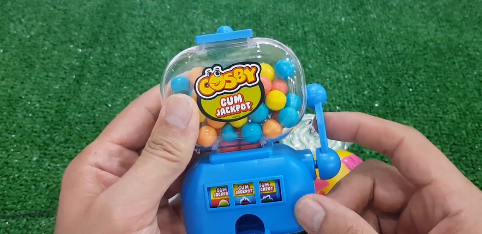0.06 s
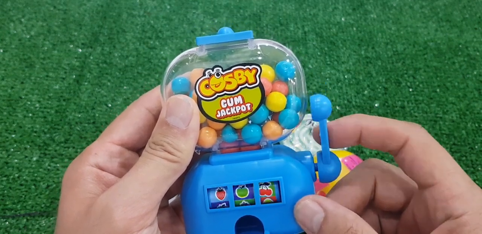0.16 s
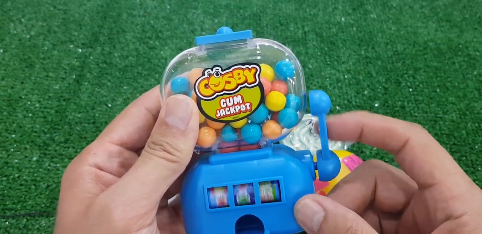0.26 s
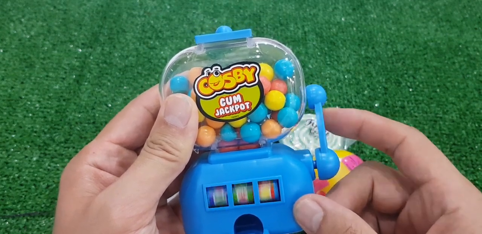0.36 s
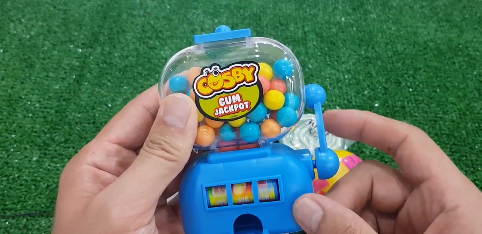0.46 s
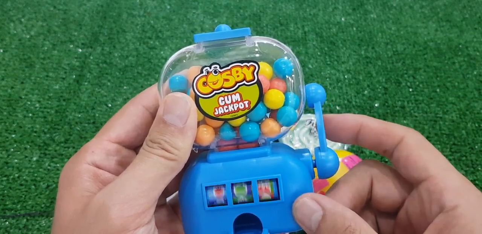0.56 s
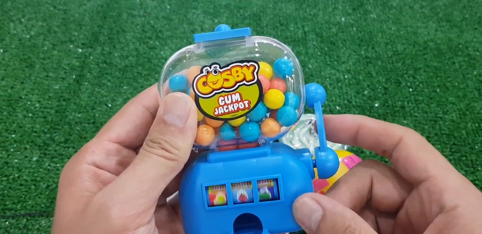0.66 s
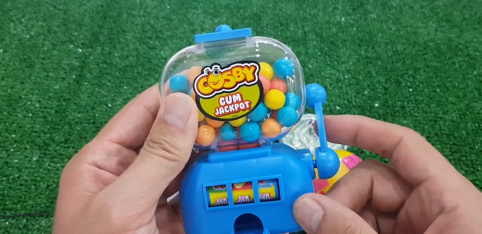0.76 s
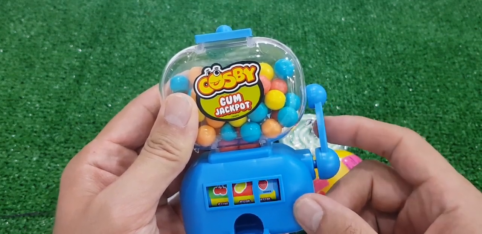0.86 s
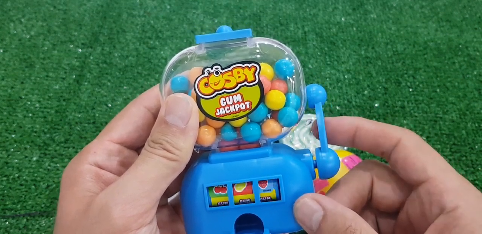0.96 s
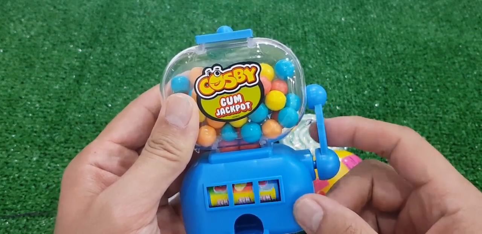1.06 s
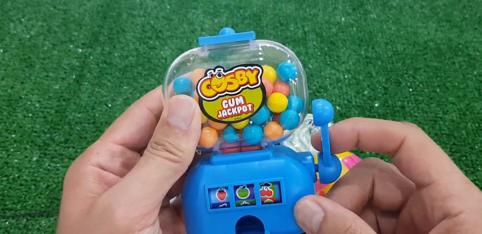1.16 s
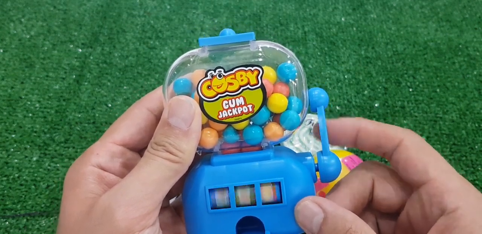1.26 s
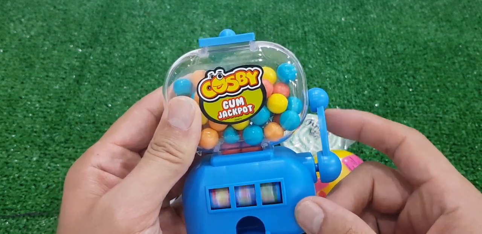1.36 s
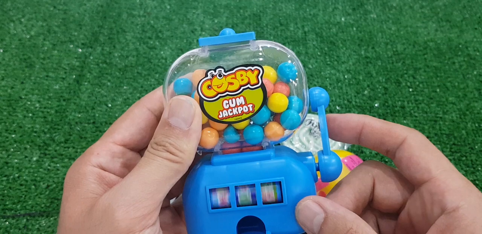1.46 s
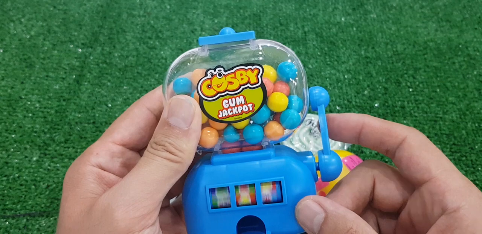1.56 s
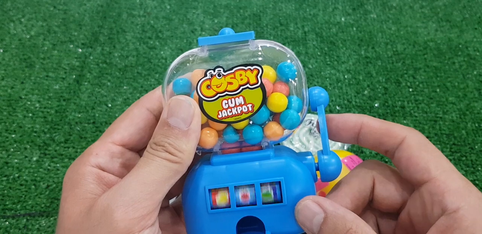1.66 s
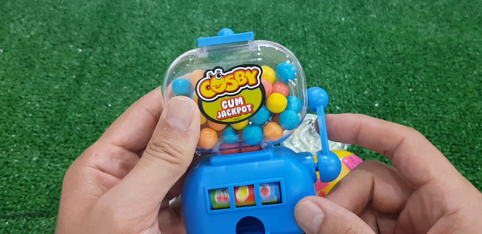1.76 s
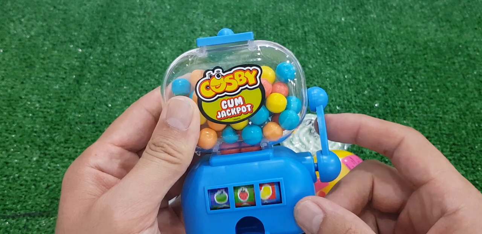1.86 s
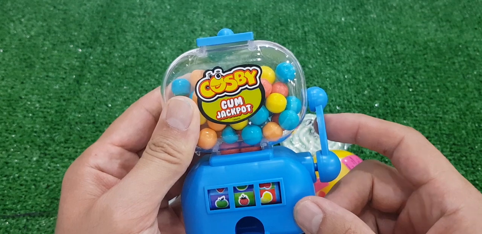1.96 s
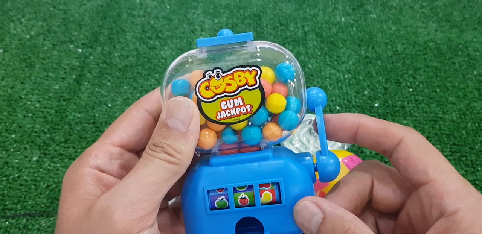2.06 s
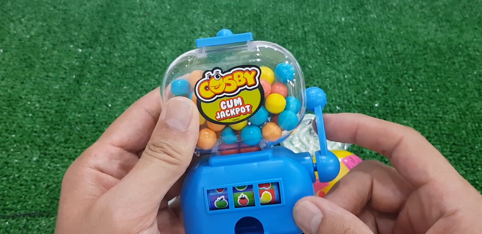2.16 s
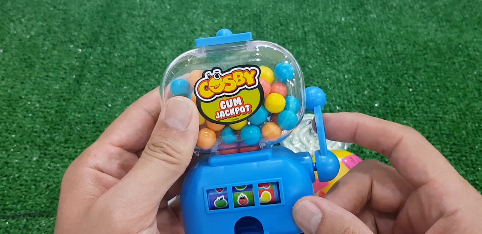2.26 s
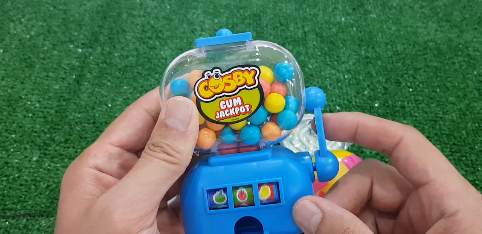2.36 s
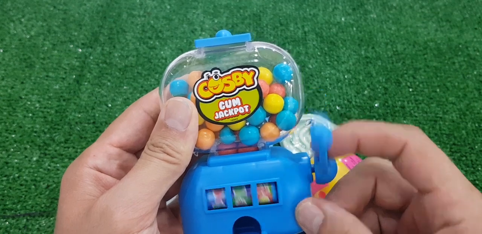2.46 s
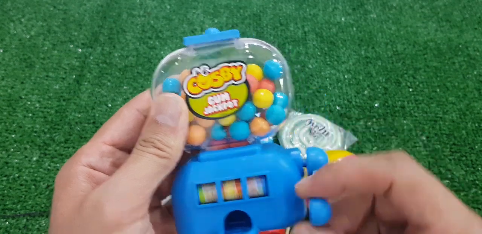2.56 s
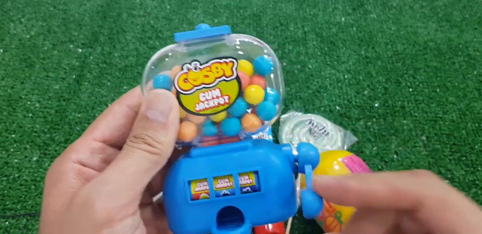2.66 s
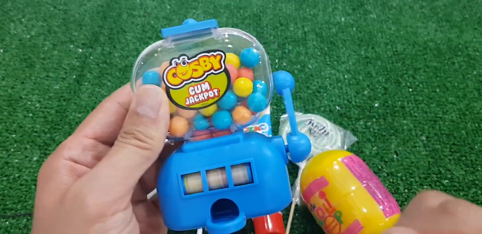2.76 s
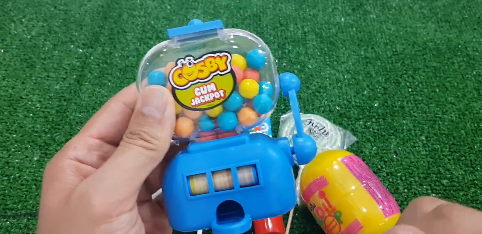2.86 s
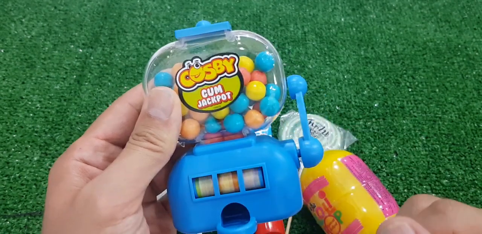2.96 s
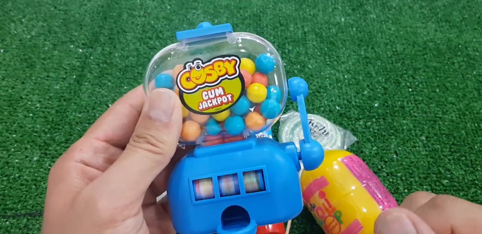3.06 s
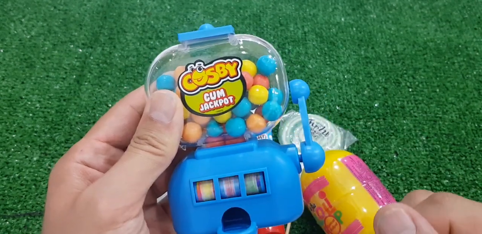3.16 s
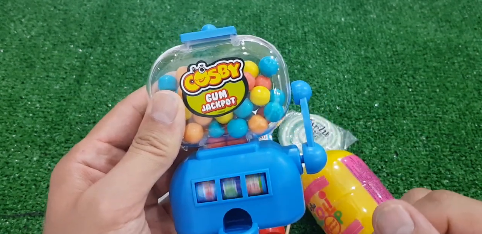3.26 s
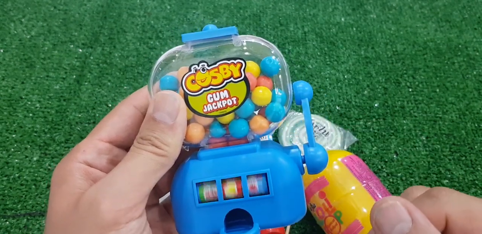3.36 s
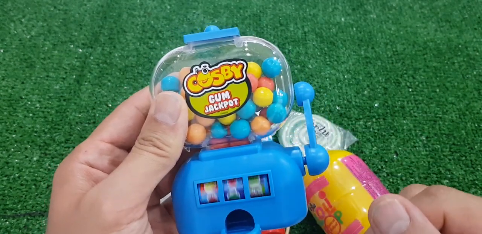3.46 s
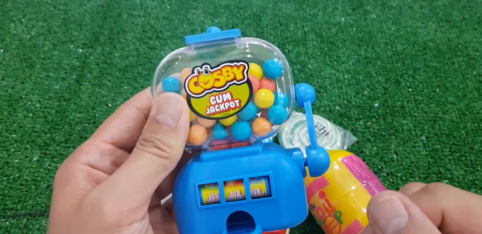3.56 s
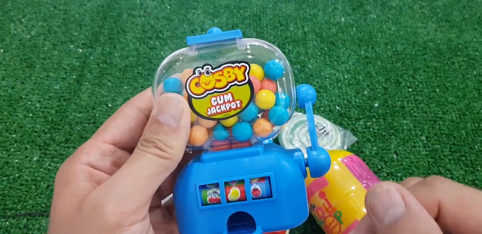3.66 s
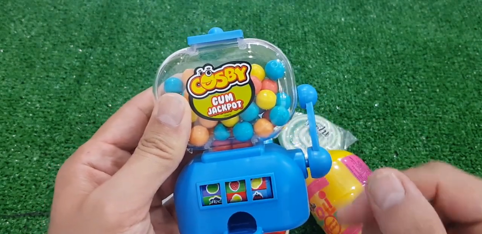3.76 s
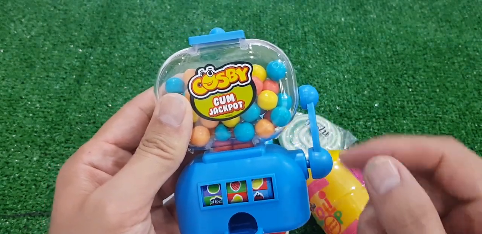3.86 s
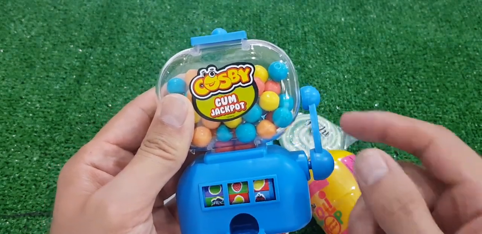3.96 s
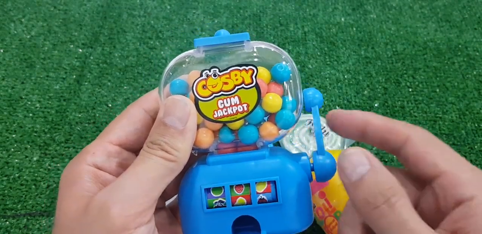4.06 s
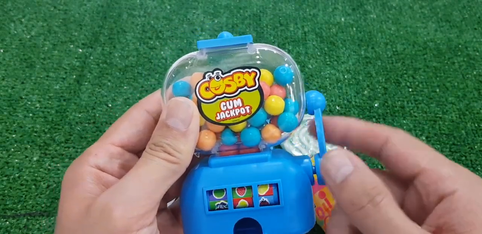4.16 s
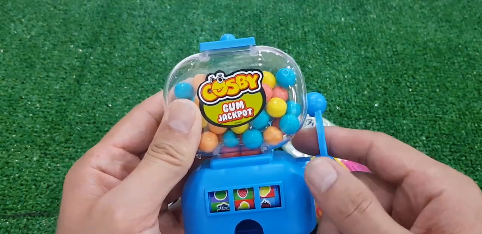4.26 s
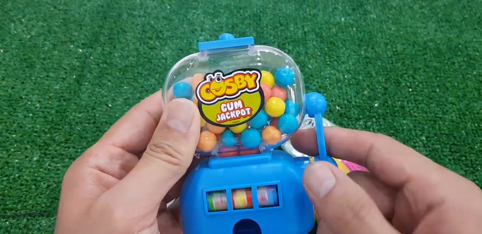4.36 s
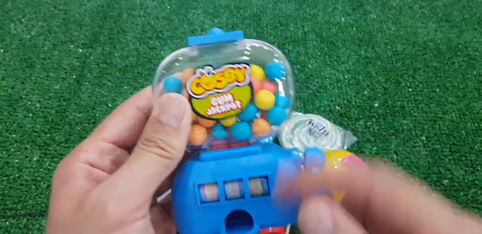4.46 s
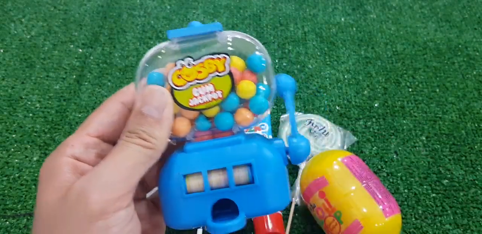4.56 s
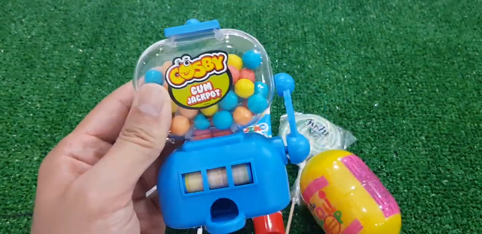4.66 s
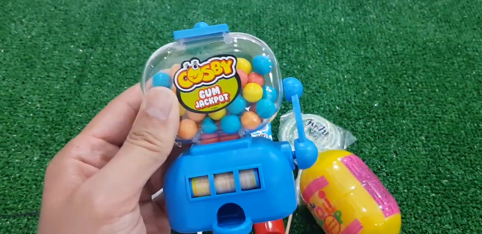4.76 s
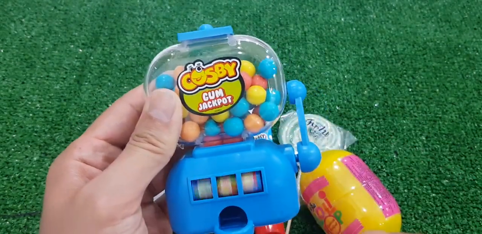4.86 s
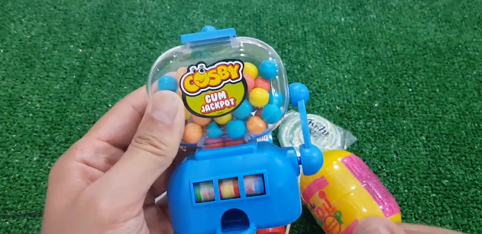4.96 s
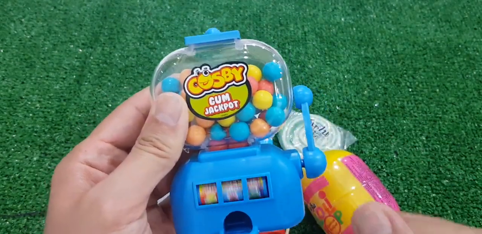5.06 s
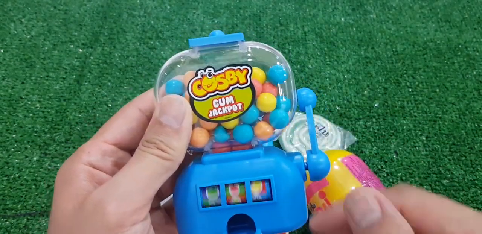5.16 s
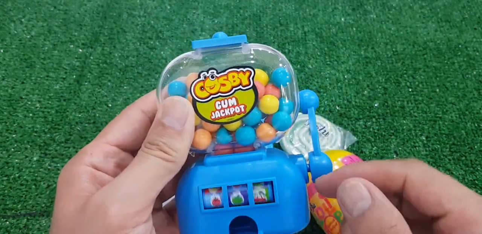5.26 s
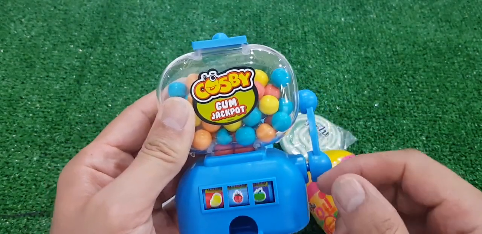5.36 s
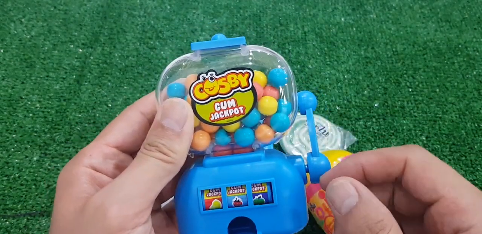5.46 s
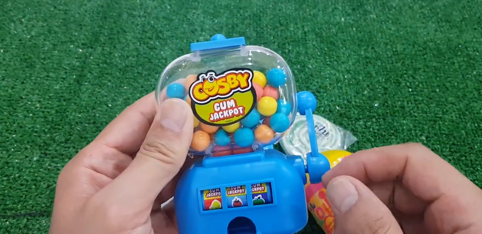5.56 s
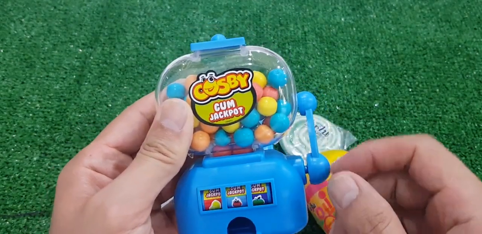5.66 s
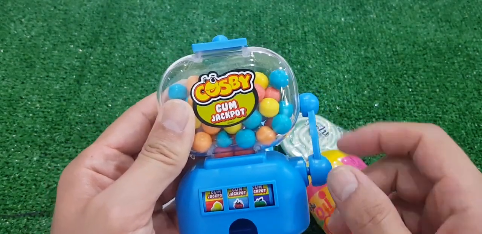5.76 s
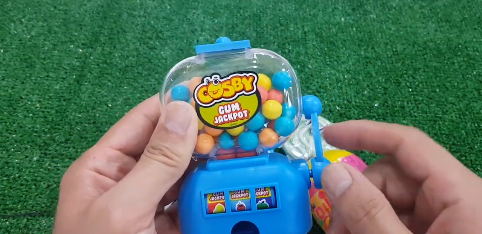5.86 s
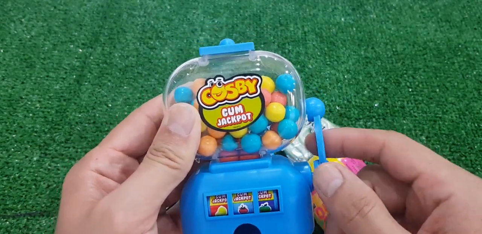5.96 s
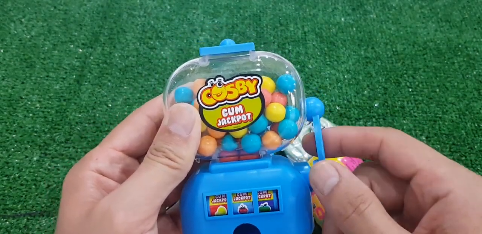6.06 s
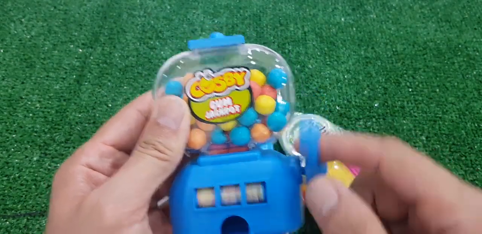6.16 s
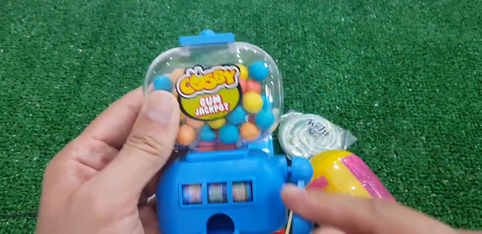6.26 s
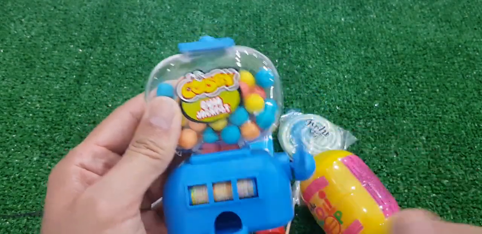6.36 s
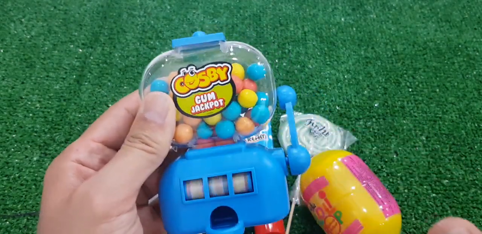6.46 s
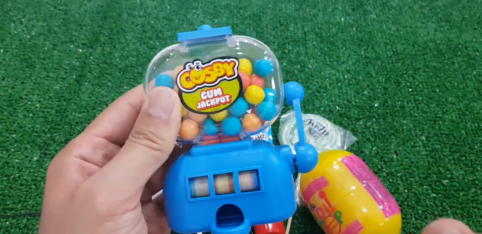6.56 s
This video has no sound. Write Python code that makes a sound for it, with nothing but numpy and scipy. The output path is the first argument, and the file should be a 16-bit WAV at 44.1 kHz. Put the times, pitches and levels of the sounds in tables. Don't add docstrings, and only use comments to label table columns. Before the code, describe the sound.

A small hollow plastic toy's lever is pulled repeatedly, ratchet teeth clicking, sharp clacks, then loose reels whirring and rattling down, close in a quiet room.

```python
import sys
import numpy as np
from scipy import signal
from scipy.fft import rfft, irfft, next_fast_len
from scipy.io import wavfile

SR = 44100
rng = np.random.default_rng(int(sys.argv[2]) if len(sys.argv) > 2 else 0)


def elevation(decibels):
    levels = np.asarray(decibels, float)
    return 10 ** (levels / 20)


def transcribe(signal):
    frames = np.atleast_2d(signal).T
    limited = np.clip(frames, -1, 1)
    pcm = np.round(limited * 32767).astype(np.int16)
    wavfile.write(sys.argv[1], SR, pcm)


N = 292383


def toy():
    beat = elevation(2.0 * drift(250))
    slow = beat * np.array([contacts(6000, 0.9) for k in range(3)])
    quick = beat * np.array([contacts(11000, 0.31) for k in range(3)])
    left, right = shell_thump(slow) + parts_clack(quick) + edges_tick(quick)
    port_lag = 4.0
    right = np.interp(np.arange(N) - port_lag, np.arange(N), right)
    return np.array([left, right])


# frequency in Hz, width in Hz, level in dB.
SHELL = [(302, 540, -23), (500, 210, -20), (702, 67, -8.5), (816, 42, -6), (859, 50, -3), (1002, 170, -3.5),
         (1153, 130, 0.5), (1267.5, 110, -0.5), (1497, 50, -1.5), (1724, 94, -10), (1820, 150, -10.5)]


def shell_thump(contact):
    chatter, blows = effort(column=1, lead_ms=1.5, blow_db=19.5)
    shell = body(chatter * at_ports(contact, 0.97) + blows, SHELL, uneven_db=3.0)
    too_small_for_bass = signal.butter(2, 250, "high", fs=SR, output="sos")
    return lean(signal.sosfilt(too_small_for_bass, shell), left_db=1.5)


# frequency in Hz, width in Hz, level in dB.
PARTS = [(1980, 260, -4), (2392, 240, 3.5), (2584, 750, 1.5), (3320, 490, 2.5), (3695, 510, 2.5),
         (4292, 720, 2), (5200, 910, 2), (5725, 200, 7), (6360, 1000, -10.5), (6900, 600, -21)]


def parts_clack(contact):
    chatter, blows = effort(column=2, lead_ms=0.27, blow_db=8.0)
    parts = body(chatter * at_ports(contact, 0.45) + blows, PARTS, uneven_db=2.0)
    return elevation(3.0) * lean(parts, left_db=1.2)


# frequency in Hz, width in Hz, level in dB.
EDGES = [(7040, 740, -6), (9925, 1100, 3), (10500, 3700, 0), (12300, 1400, -2.5), (15400, 3400, -6)]


def edges_tick(contact):
    chatter, blows = effort(column=3, lead_ms=0.74, blow_db=19.5)
    edges = body(chatter * at_ports(contact, 0.35) + blows, EDGES, uneven_db=2.0)
    return elevation(2) * lean(edges, left_db=2)


# start in seconds, hollow thump in dB, clack in dB,
# bright tick in dB, time to die 20 dB in ms.
KNOCKS = [(0.161, -34, -40, -43.5, 12.5), (1.124, -43.5, -56.5, -76, 12), (1.142, -38, -39, -59, 3),
          (1.15, -25, -37, -49, 5), (1.191, -34, -31, -61, 2), (1.338, -36, -28.5, -34.5, 23),
          (2.452, -45.5, -58.5, -66, 20.5), (2.501, -36, -60.5, -48, 11), (2.772, -30, -35, -49, 11),
          (2.792, -14, -14.5, -15, 39.5), (4.436, -38, -32, -33, 7), (4.588, -12, -15.5, -15.5, 45),
          (6.19, -39.5, -43, -49, 14.5), (6.429, -27, -22, -65, 12.5), (6.435, -13.5, -21, -70, 13),
          (6.443, -6, -8.5, -9, 13.5)]
# start in seconds, thump in dB, clack in dB, tick in dB.
TOUCHES = [(1.949, -55, -73, -88), (4.312, -57, -76.5, -89), (4.422, -54, -64, -88),
           (5.343, -65, -52, -54.5), (5.363, -68.5, -65.5, -75), (5.563, -66.5, -87, -92.5),
           (5.687, -65, -85, -89), (5.841, -69, -83.5, -91), (5.962, -71, -83.5, -87.5),
           (6.046, -55, -63.5, -91.5), (6.095, -50, -49.5, -69.5), (6.117, -53.5, -75.5, -91),
           (6.168, -47.5, -57.5, -91)]


def lever():
    swell_ms, touch_die_ms = 2.1, 13
    knocks = [(s, thump, clack, tick, swell_ms, die) for s, thump, clack, tick, die in KNOCKS]
    return knocks + [(*row, swell_ms, touch_die_ms) for row in TOUCHES]


# peak in seconds, thump in dB, clack
# in dB, time to die 20 dB in ms.
TEETH = [
    (0.181, -39, -44.5, 26),
    (0.203, -43.5, -41.5, 9),
    (0.36, -54, -68, 21.5),
    (0.381, -47, -62, 17.5),
    (0.407, -35, -28.5, 18),
    (1.181, -33.5, -32, 21.5),
    (1.303, -44.5, -50, 13),
    (1.316, -51, -49, 8),
    (1.329, -30, -37.5, 8),
         (2.43, -60, -69, 25), (2.475, -72, -66, 39), (2.513, -32, -44, 11),
              (2.529, -26.5, -37.5, 14.5), (2.548, -36, -30, 15), (2.585, -23, -22.5, 10.5),
              (2.603, -38, -27, 28), (2.621, -20.5, -27.5, 8.5), (2.643, -54, -32, 13),
              (2.654, -30.5, -33, 22.5), (4.45, -37.5, -47.5, 10), (4.469, -51, -58, 24),
              (4.499, -29.5, -29.5, 22.5), (4.532, -34, -38, 4), (4.542, -40, -29.5, 7),
              (4.558, -29, -27, 34.5), (6.21, -37, -45, 14.5), (6.226, -40, -40.5, 25),
              (6.261, -31, -38.5, 22), (6.273, -29.5, -25, 21), (6.292, -23.5, -24, 11),
              (6.318, -22.5, -25.5, 21), (6.33, -21, -27, 21), (6.358, -49, -33.5, 21),
              (6.384, -47, -36, 36), (6.411, -27.5, -32.5, 12.5)]


def ratchet():
    return [(s, thump, clack, 5.6 + 1.432 * clack, die, die)
            for s, thump, clack, die in TEETH]


# peak in seconds, clack in dB,
# time to die 20 dB in ms.
RUBS = [(0.475, -62, 20), (0.514, -45.5, 19), (0.54, -37, 9.5), (0.618, -77, 22), (1.363, -39.5, 25),
        (1.389, -37.5, 16), (1.438, -32.5, 19), (1.454, -38.5, 18), (1.481, -34.5, 19),
        (1.53, -38.5, 12), (1.567, -41, 56),
        (2.838, -20.5, 33), (2.856, -24.5, 27), (2.903, -30, 30), (2.945, -28.5, 38),
             (2.988, -30.5, 33), (3.05, -33.5, 9), (3.065, -31.5, 22), (3.09, -31, 46), (3.172, -39, 26),
             (3.256, -41.5, 24), (3.274, -42.5, 42), (3.38, -55, 60), (3.454, -70, 89.5),
             (4.635, -22.5, 29), (4.653, -23.5, 22), (4.708, -27, 41), (4.759, -28, 14), (4.798, -32, 35),
             (4.833, -31, 10), (4.856, -36, 15), (4.884, -32, 45), (4.92, -35, 35), (4.999, -37.5, 46),
             (5.09, -55.5, 31), (5.152, -51, 41), (6.465, -21.5, 29), (6.483, -19.5, 38), (6.534, -30, 2),
             (6.562, -28, 25), (6.596, -30, 24)]
# first cog click in seconds, clack in dB, loss in dB per second,
# gap between clicks in ms.
SPINS = [
    (0.435, -47.5, 93, 19),
    (1.368, -41.5, 79, 20),
    (2.8805, -30, 65.5, 20.5),
    (4.674, -32.5, 68.5, 21.0),
    (6.496, -28.5, 60, 21),
]


def reels():
    rubs = [(s, clack, die, die) for s, clack, die in RUBS]
    cogs, swell_ms, die_ms = 30, 9, 24
    for s, clack, loss, gap in SPINS:
        for t in np.arange(cogs) * gap / 1000:
            if s + t < N / SR:
                rubs.append((s + t, clack - loss * t, swell_ms, die_ms))
    return [(s, -14 + 0.75 * clack, clack, 1.8 + 1.312 * clack, swell, die)
            for s, clack, swell, die in rubs]


def effort(column, lead_ms, blow_db):
    power, blows = np.zeros(N), np.zeros(N)
    for burst in lever() + ratchet() + reels():
        level_db, swell_ms, die_ms = burst[column], burst[4], burst[5]
        at = round((burst[0] - lead_ms / 1000) * SR)
        swell, die = max(swell_ms, 1) / 1000, max(die_ms, 2) / 1000
        i = np.arange(max(at - int(swell * SR), 0), min(at + int(3 * die * SR), N))
        t = (i - at) / SR
        power[i] += elevation(2 * (level_db - 20 * np.maximum(-t / swell, t / die)))
        blows[at] += elevation(level_db + blow_db - 2.4 * swell_ms)
    return np.sqrt(power), blows


def contacts(per_s, spread_db):
    sizes = elevation(spread_db * np.minimum(rng.exponential(1, N), 4)) * rng.choice([-1, 1], N)
    return rms_one(sizes * (rng.random(N) < per_s / SR))


def body(force, modes, uneven_db):
    out, energy = 0, 0
    for k, (hz, width_hz, level_db) in enumerate(modes):
        r = np.exp(-np.pi * width_hz / SR)
        share = elevation(level_db + uneven_db * drift(60)) * (-1) ** k
        poles = [2, -4 * r * np.cos(2 * np.pi * hz / SR), 2 * r * r]
        out = out + signal.lfilter([1 - r * r, 0, r * r - 1], poles, force * share + 1e-18)
        energy += elevation(level_db) ** 2 * (1 - r * r) / 2
    return out / np.sqrt(energy)


def at_ports(contact, alike):
    return np.sqrt(alike) * contact[0] + np.sqrt(1 - alike) * contact[1:]


def lean(x, left_db):
    return x * elevation([[left_db / 2], [-left_db / 2]])


def rms_one(x):
    return x / np.sqrt(np.mean(x ** 2) + 1e-20)


def drift(rate):
    step = 40
    r = np.exp(-2 * np.pi * step * rate / SR)
    slow = signal.lfilter([1], [1, -2 * r, r * r], rng.standard_normal(N // step + 2002))[2000:]
    return np.interp(np.arange(N) / step, np.arange(len(slow)), rms_one(slow))


def room(x):
    t60_s, wall_cut_hz = 0.31, 6400
    size = next_fast_len(N + SR)
    w = 2 * np.pi * np.arange(size // 2 + 1) / size
    dull = np.exp(-2 * np.pi * wall_cut_hz / SR)
    wall = (1 - dull) / (1 - dull * np.exp(-1j * w))
    out = np.zeros((2, len(w)), complex)
    lags = (rng.uniform(0.009, 0.036, 16) * SR).astype(int)
    for k, lag in enumerate(lags):
        loop = elevation(-60 * lag / SR / t60_s) * wall * np.exp(-1j * w * lag)
        out[k % 2] += loop / (1 - loop) * (-1) ** (k // 2)
    return irfft(out * rfft(x, size), size)[:, :N] / np.sqrt(8)


# time in seconds, third order in Hz, third order in dB,
# load heard as exhaust rush in dB.
ENGINE = [(0.0, 130.7, -62.5, -62), (0.77, 131.5, -54.5, -67), (1.02, 132.4, -68.5, -68),
          (1.2, 129, -64.5, -65), (1.5, 127.5, -61, -64), (1.98, 127.3, -60.5, -64.5),
          (2.18, 123.1, -65, -65.5), (2.47, 122.9, -58.5, -63), (3.06, 123.4, -62.5, -65),
          (4.2, 128.8, -61.5, -73.5), (5.21, 133.8, -65, -69.5), (5.48, 136.4, -84, -75),
          (5.91, 136.7, -65.5, -72), (6.2, 139.1, -89.5, -74), (6.63, 137.8, -79, -77)]
# engine order, level in dB re third order, waver in dB.
ORDERS = [(1, -4.5, 5.5), (2, -6.5, 5), (3, 1.5, 2), (4, -13, 2.5)]
# frequency in Hz, level in dB per Hz.
RUSH = [(120, -30), (200, -5.5), (470, -7.5), (560, -13), (1130, -12.5), (2400, -27), (5000, -38.5),
        (9000, -48.5)]


def engine():
    s, *columns = np.transpose(ENGINE)
    third_hz, third_db, rush_db = [np.interp(np.arange(N) / SR, s, c) for c in columns]
    turns = np.cumsum(third_hz / 3) / SR
    drone = np.zeros(N)
    for order, level_db, waver_db in ORDERS:
        level = np.sqrt(2) * elevation(third_db + level_db + waver_db * drift(6.2))
        drone += level * np.sin(2 * np.pi * order * turns + 0.3 * drift(3))
    return drone + elevation(rush_db + 1.1 * drift(4.6)) * stereo_noise(RUSH)


# start in seconds, length in seconds, pitch in Hz, level in dB.
HOOTS = [
    (3.7, 0.087, 436, -64.5),
    (3.989, 0.11, 425, -61.5),
    (5.45, 0.3, 1567, -84.5),
    (5.824, 0.14, 410, -73),
]


def hoots():
    out = np.zeros(N)
    for s, length, hz, level_db in HOOTS:
        u = np.arange(int(length * SR)) / (length * SR)
        tone = np.sin(2 * np.pi * np.cumsum(hz * (1.03 - 0.081 * u)) / SR)
        start = int(s * SR)
        out[start:start + len(u)] += elevation(level_db) * np.sin(np.pi * u) * tone
    return out


# frequency in Hz, level in dB per Hz.
HUSH = [(31, -47.5), (42, -4.5), (80, -1.5), (150, -15.5), (330, -20.5), (600, -35), (1500, -41.5),
        (2500, -47.5), (6000, -50.5), (8600, -59), (10200, -41.5), (12000, -34), (15800, -37)]


def room_hush():
    hush = elevation(-61) * stereo_noise(HUSH) * elevation([[0.6], [-0.6]])
    rumble = signal.sosfilt(signal.butter(2, [180, 600], "band", fs=SR, output="sos"), hush)
    return hush + (elevation(2.3 * drift(4.6)) - 1) * rumble


# frequency in Hz, left-right likeness from 0 to 1.
LIKENESS = [(60, 0.66), (180, 0.61), (550, 0.65), (1650, 0.019), (4970, 0.47), (15000, 0.28)]


def stereo_noise(spectrum):
    hz = np.maximum(np.arange(N // 2 + 1) * SR / N, 1)
    alike = np.clip(at_hz(LIKENESS, hz), -0.9, 1)
    mid, side = rfft(rng.standard_normal((2, N)))
    both = np.sqrt(1 + alike) * mid + np.sqrt(1 - alike) * side * [[1], [-1]]
    return rms_one(irfft(both * elevation(at_hz(spectrum, hz)), N))


def at_hz(points, hz):
    points_hz, values = np.transpose(points)
    return np.interp(np.log(hz), np.log(points_hz), values)


def scene():
    near = toy()
    to_walls = signal.lfilter([1.3, -0.55], [1], near.mean(axis=0))
    return near + elevation(-2) * room(to_walls) + engine() + hoots() + room_hush()


def band_limit(x):
    return signal.sosfilt(signal.butter(12, 16650, fs=SR, output="sos"), x)


def record(dry):
    top_cut = signal.cheby2(12, 60, 16000 * 1.03, fs=SR, output="sos")
    mix = np.clip(signal.sosfilt(top_cut, dry), -1, 1)
    return band_limit(mix)


dry = scene()
out = record(dry)
transcribe(out)
```